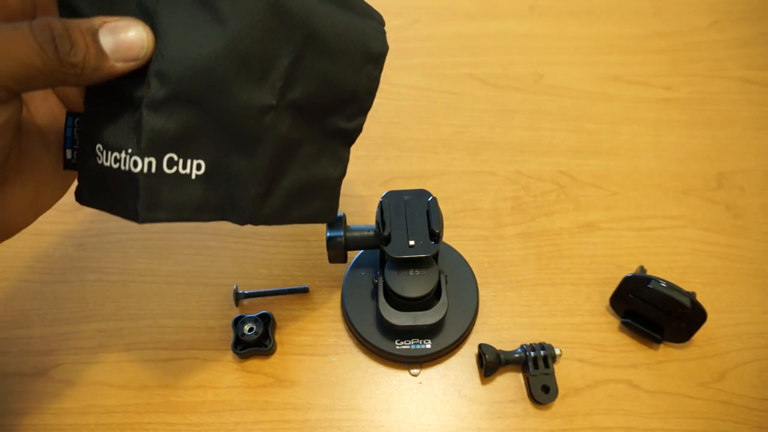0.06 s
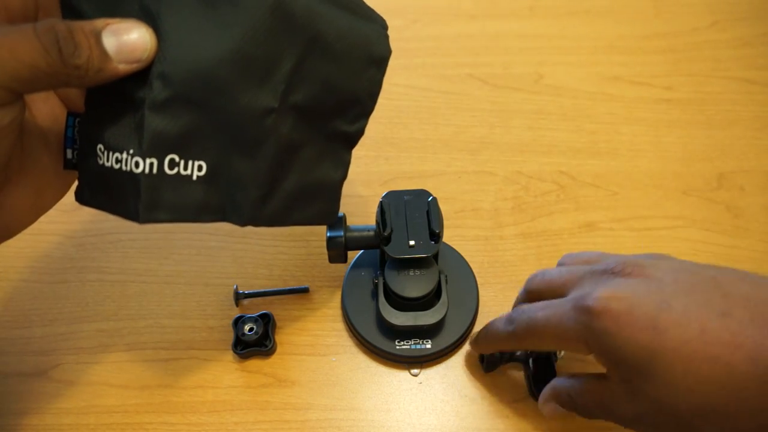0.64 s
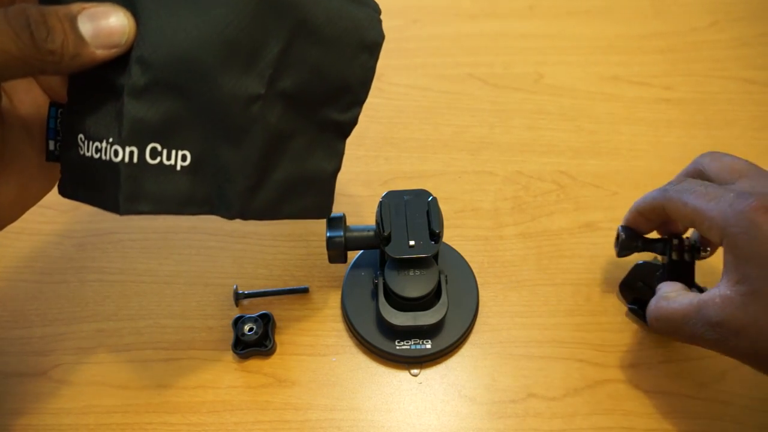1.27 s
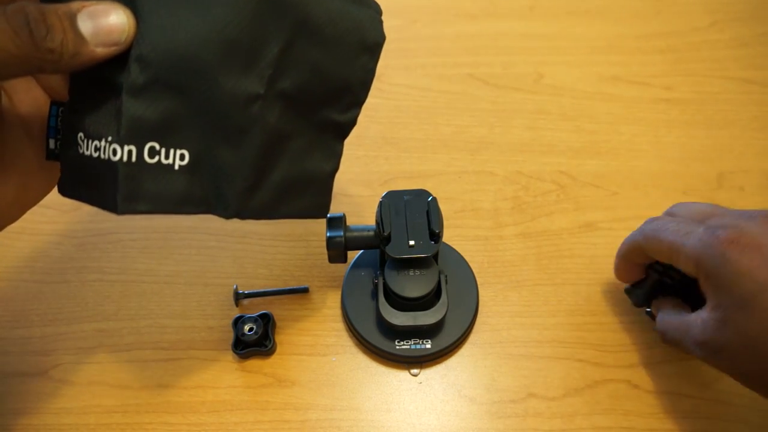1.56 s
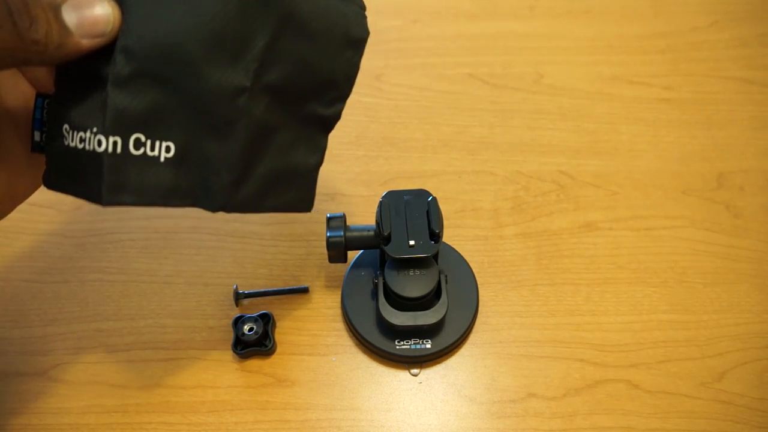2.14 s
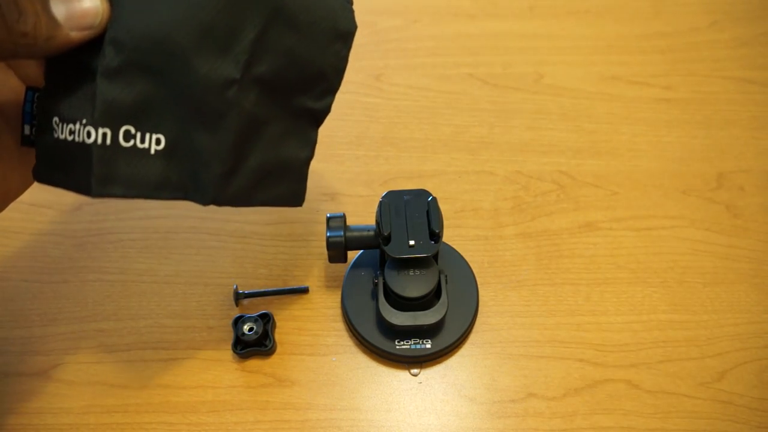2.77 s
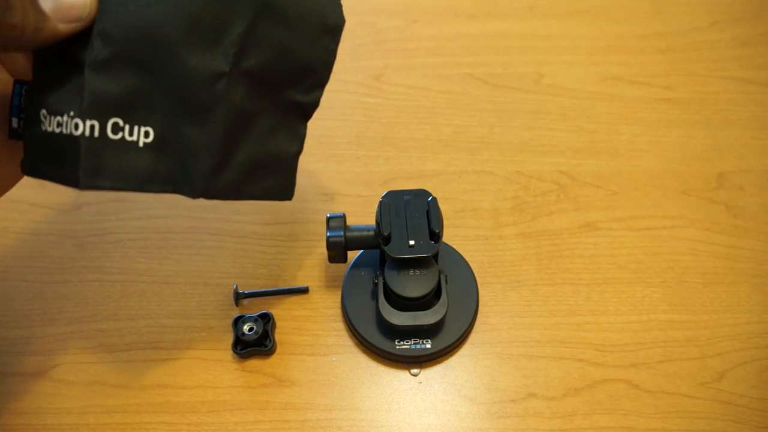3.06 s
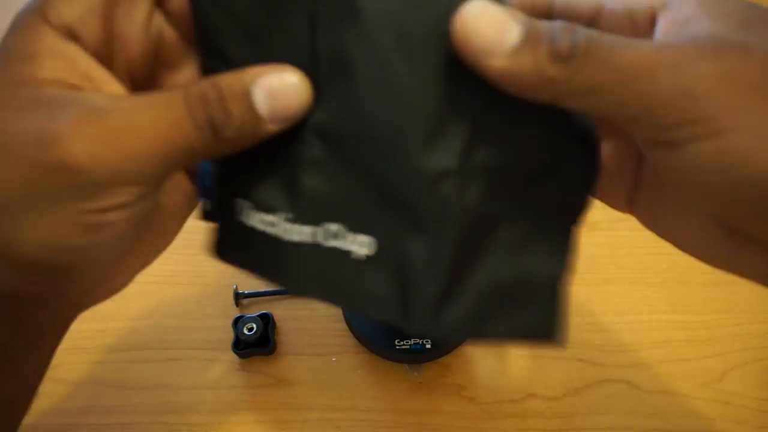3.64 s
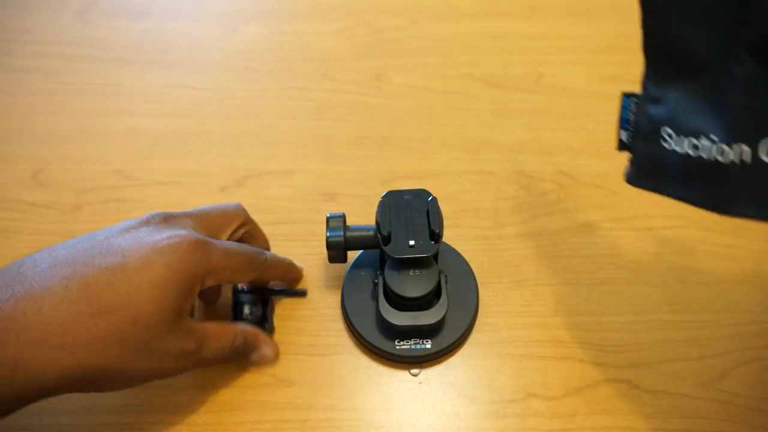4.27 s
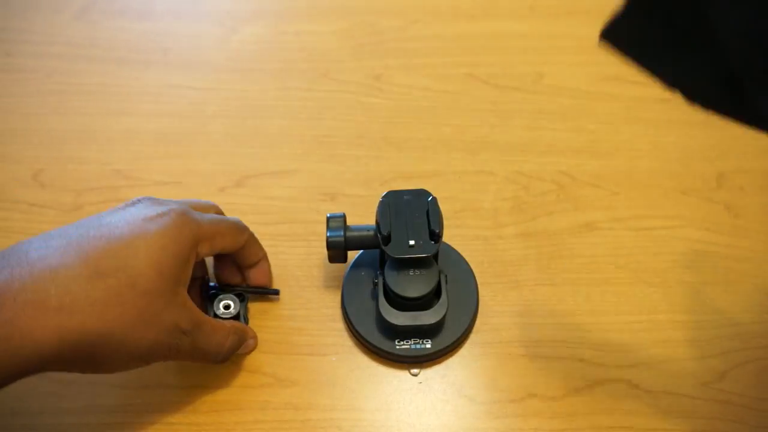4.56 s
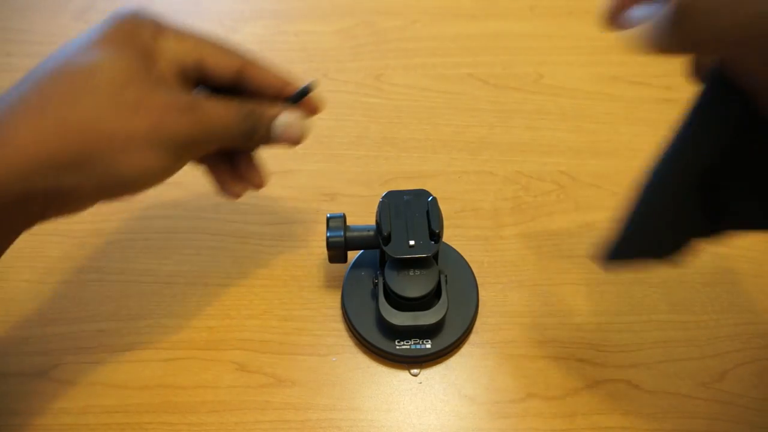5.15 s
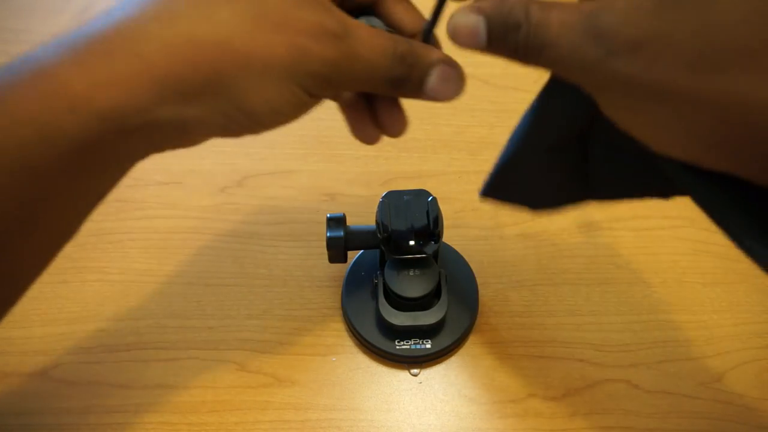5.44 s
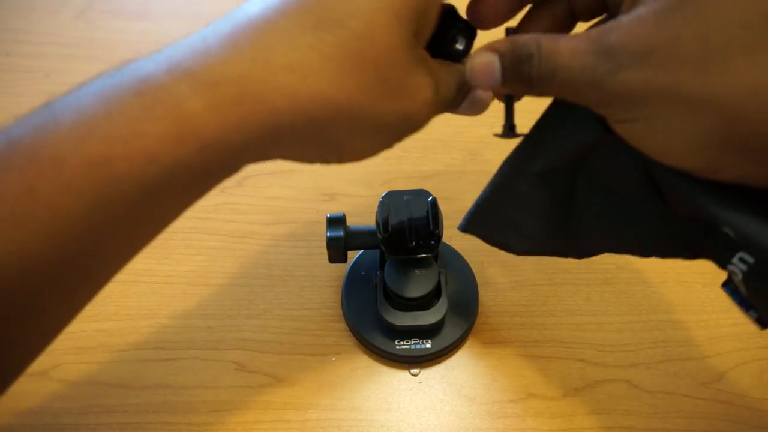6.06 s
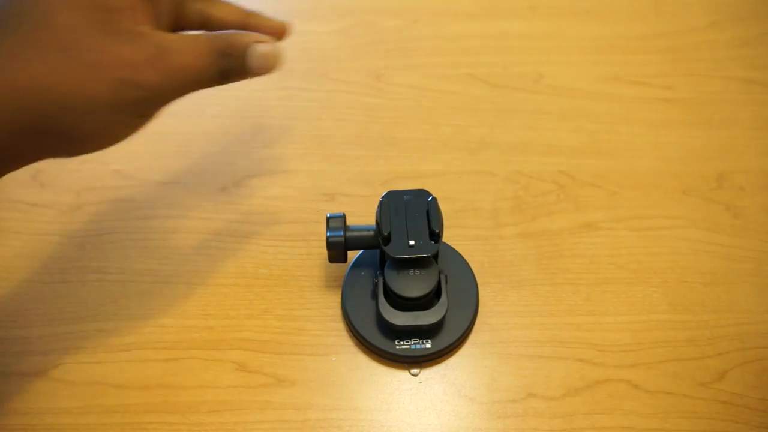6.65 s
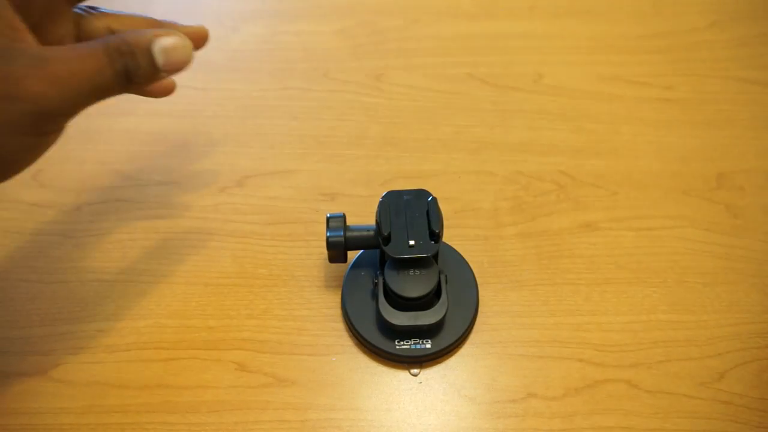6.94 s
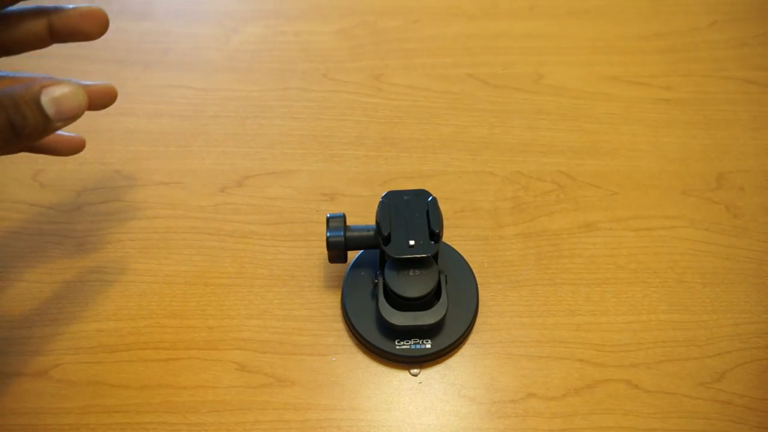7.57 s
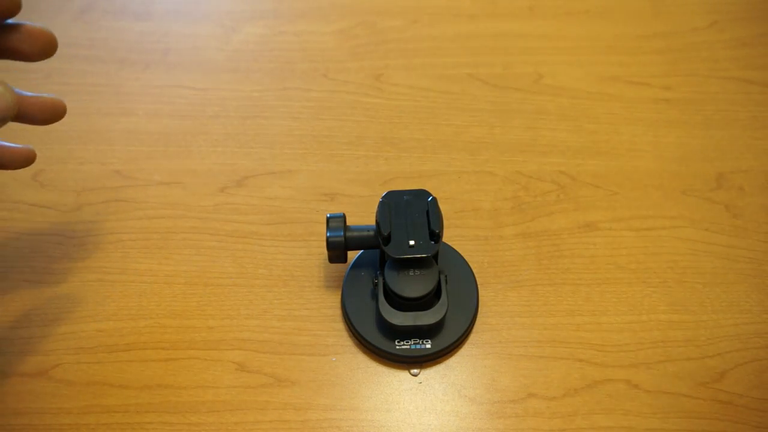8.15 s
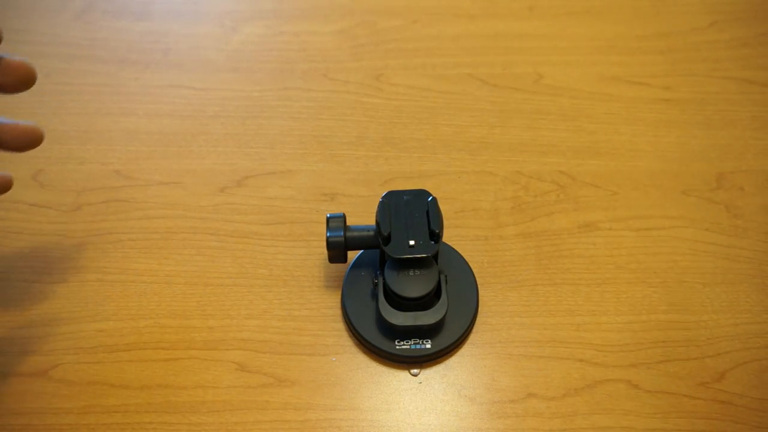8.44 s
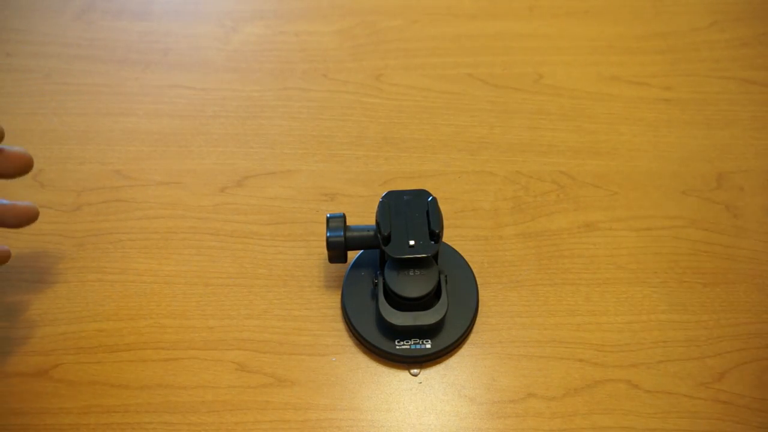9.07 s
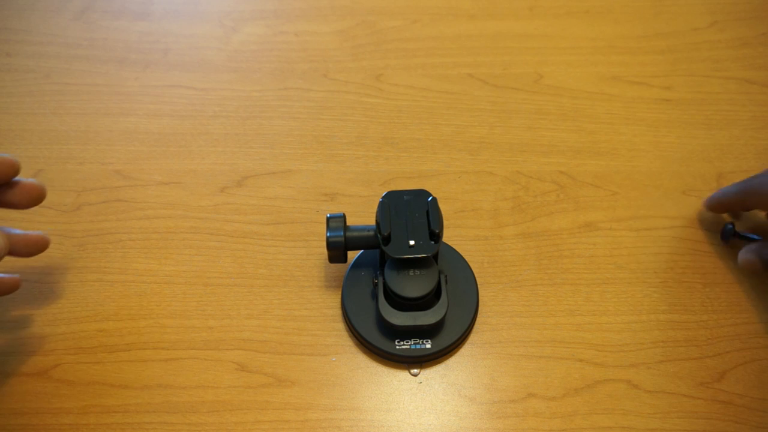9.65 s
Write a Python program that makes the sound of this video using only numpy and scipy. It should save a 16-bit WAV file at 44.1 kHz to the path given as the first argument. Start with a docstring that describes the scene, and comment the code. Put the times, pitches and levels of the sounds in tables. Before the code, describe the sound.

A low ventilation hum runs throughout in a bare, slightly echoing room, with the handling heard close up. Soft plastic knocks on a wooden table begin around 0.8 seconds, building to a quick clatter at 1.5 with a tiny squeak and pings from steel bolts. From 2.2 to 3 seconds comes the loudest tumble of parts, with clinks and short scrapes. A nylon pouch rustles and crinkles from about 3.6 to 5.3 seconds, while a small knock and a loose nut's high jingle sound between 4.4 and 4.9. Faint fabric brushing and light metal ticks continue until about 6.7. Separate plastic knocks fall between 7.2 and 8.2 seconds, followed by a rapid ratcheting run of clicks until 8.6. A part then slides across the wood, knocking sharply at 9.3 and scraping until about 9.8 seconds.

```python
"""Plastic parts on a wooden table

Small plastic camera-mount parts are gathered and put down to one side in a bare room. They knock,
tumble and scrape, driving the resonances of the tabletop. Steel bolts and a nut ping in their own modes,
a nylon pouch rustles from hand to hand by friction, and at the end a part is pushed across the wood.
Ventilation hums under it all."""
import sys
import numpy as np
from scipy import signal
from scipy.fft import rfft, irfft, next_fast_len
from scipy.io import wavfile
from scipy.ndimage import uniform_filter1d

SR = 44100
rng = np.random.default_rng(int(sys.argv[2]) if len(sys.argv) > 2 else 0)


def master(y):
    """Save y as 16-bit WAV."""
    cut = np.clip(np.atleast_2d(y).T, -1, 1)
    pcm = np.round(cut * 32767)  # scale
    wavfile.write(sys.argv[1], SR, pcm.astype(np.int16))


N = 432621


def impacts():
    """Impact and rebound: parts land on the wood, then rattle on their corners as they tumble."""
    # Each row: start in seconds, level in dB, hardness from 0 to 1.
    landings = [(.001, -34, 0.45), (0.78, -45, 0.2), (.905, -36, 0), (.916, -36.5, 0), (.935, -36.5, 0),
                (1.199, -35.5, 0.18), (1.225, -44, 0.3), (1.4157, -26, 0.18), (1.43, -27, 0.48),
                (1.445, -29, 0.4), (1.4766, -23, 0.57), (1.494, -33, 0.88), (1.511, -25, 0.66),
                (1.526, -25, 0.59), (2.176, -41.5, 0.67), (2.198, -38, 0.73), (2.336, -24.5, 0.73),
                (2.344, -22, .6), (2.361, -31, 0.73), (2.3794, -25, 0.65), (2.5239, -29.5, .5),
                (2.5624, -18, 0.43), (2.591, -25, 0.5), (2.6174, -20, .5), (2.643, -22.5, 0.64),
                (2.663, -21, 0.5), (2.691, -24, 0.64), (2.7203, -23.5, 0.62), (2.752, -24.5, 0.77),
                (2.778, -19.5, 0.53), (2.8, -26.5, 0.6), (2.82, -26, .3), (2.982, -48, .65),
                (4.3599, -35, 0.6), (4.3834, -33, .8), (4.3923, -30.5, 0.79), (4.399, -34, 0.82),
                (4.763, -45, 0.89), (4.846, -42.5, 0.87), (7.17, -36, 0), (7.176, -31, 0.05),
                (7.199, -29, 0.48), (7.23, -34, 0), (7.3533, -25, 0.65), (7.376, -34.5, 0.62),
                (7.523, -39, 0.2), (7.656, -51, 0), (7.846, -37, 0.03), (8.2466, -25, 0.68),
                (9.3184, -32, 0.38), (9.333, -29.5, 0.64), (9.3465, -24.5, 0.48), (9.434, -38.5, 0.77),
                (9.556, -43, 0.82), (9.719, -37, 0.72)]
    # Each row: start in seconds, length in seconds, mean level of a contact in dB.
    tumbles = [(1.449, .09, -33.5), (2.342, .04, -33.5), (2.479, .06, -41.5), (2.63, .1, -32),
               (2.796, 0.031, -34.5), (2.917, .1, -45), (4.401, .045, -39.5), (9.347, .05, -41.5)]
    out = np.zeros(N)
    for start, db, hardness in landings:
        add(out, start, amp(db) * blow(hardness))
    for start, length, db in tumbles:
        corners = [blow(hardness=0.59) for _ in range(6)]
        for k, (at, chance_db) in enumerate(touches(start, length, per_s=80, spread_db=3)):
            add(out, at, amp(db + chance_db) * corners[k % len(corners)])
    return out


def blow(hardness, knock_width=1.843):
    """Contact time sets bandwidth: a hard blow is brief and bright, a soft one longer and lower."""
    # The softest and hardest blow. Each: knock pitch in Hz, then thud, clack and tick gains in dB.
    softest = (887, -1.5, -31.5, -38)
    hardest = (1490, -8, 9, -9.5)
    # Thud, clack and tick before softening. Each row: low and high edge in Hz, level in dB, T60 in seconds.
    bands = [(127, 660, -4, 0.094), (2575, 4290, 1, 0.023), (5000, 14600, -4.5, 0.0067)]
    knock_hz, thud_db, clack_db, tick_db = softest + hardness * np.subtract(hardest, softest)
    softness = np.clip(-clack_db / 25, 0, 1)
    stretch, dulling = 1 + softness, 1 - 0.2 * softness
    snap = 3.7 * (1 - softness)
    sound = burst(knock_hz / knock_width, knock_hz * knock_width, 0.039 * stretch, snap)
    for (lo, hi, band_db, t60), gain_db in zip(bands, (thud_db, clack_db, tick_db)):
        sound += amp(band_db + gain_db) * burst(lo, hi * dulling, t60 * stretch, snap)
    return sound


def tabletop(force):
    """Forced vibration: the board passes the force on and rings at its resonances."""
    # Each row: frequency in Hz, bandwidth in Hz, gain over the broad response in dB.
    resonances = [(135.3, 10.6, 10), (424, 240, 2.5), (290, 28, 9.5), (524, 23, 3.5), (770, 20, 3),
                  (911, 22, 4.5), (1180, 48, 4), (1338, 11, 6.5), (1440, 47, 3.5), (1670, 25, 2.5),
                  (1764, 12, 4.5), (1914, 100, 1), (2820, 30, 4.5), (2440, 670, 2.5), (3250, 44, 4.5),
                  (3990, 200, -4), (4360, 90, -1), (5800, 450, 4), (7000, 490, 2)]
    out = force.copy()
    for hz, width, db in resonances:
        out += (amp(db) - 1) * signal.lfilter(*signal.iirpeak(hz, hz / width, fs=SR), force)
    return out


def bolts():
    """Free vibration: struck steel bolts ring in high, inharmonic modes."""
    # Each row: frequency in Hz, level in dB, T60 in seconds.
    modes = [(4555, -2, 0.063), (4512, -18, 0.41), (4800, -43, 0.04), (6500, -31, 0.042),
             (6720, -14, 0.094), (7000, -10, 0.14), (7800, -20, 0.13), (9860, -16, 0.045),
             (10130, 1, 0.017), (10840, -3, 0.035), (12300, -7, .025), (13000, -10, .05)]
    # Each row: start in seconds, level in dB, favoured frequency in Hz.
    strikes = [(1.199, -28, 10600), (1.417, -36, 8260), (1.477, -22.5, 7000), (1.496, -27, 4460),
               (1.511, -24, 4600), (2.337, -18, 5000), (2.524, -35, 4500), (2.586, -22, 4530),
               (2.643, -17.5, 4440), (2.721, -29, 7240), (2.753, -29, 6760), (3.018, -35.5, 4400)]
    return pings(strikes, modes, reach_octaves=0.28, rattle=0.55)


def jiggling_nut(jiggle_db=-9):
    """Repeated impact: a nut loose in its knob rings when struck and again at each lighter touch."""
    # Each row: frequency in Hz, level in dB, T60 in seconds.
    modes = [(5880, -5.5, 0.02), (8140, 3, 0.02), (8240, -1.5, 0.036), (8450, 2, 0.027), (10370, 0, 0.028)]
    # Each row: start in seconds, level in dB, favoured frequency in Hz, length of the jiggle in seconds.
    jolts = [(4.36, -27, 8400, .06), (4.709, -36.5, 8340, .04), (4.761, -23, 9340, .06),
             (4.846, -24, 5500, .005), (4.889, -17, 5500, .005), (5.431, -48, 8250, .12),
             (6.057, -40.5, 8300, .05), (6.107, -35.5, 8900, .005), (6.169, -41, 9000, .02),
             (6.375, -49, 8300, .02), (7.845, -47, 8300, .03), (8.249, -36, 7860, .035)]
    strikes = []
    for start, db, hz, length in jolts:
        strikes.append((start, db, hz))
        for at, chance_db in touches(start, length, per_s=110, spread_db=2.5):
            strikes.append((at, db + jiggle_db + chance_db, hz))
    return pings(strikes, modes, reach_octaves=0.15, rattle=1.0)


def pings(strikes, modes, reach_octaves, rattle):
    """Modal superposition: a strike favours modes near one pitch; a loose fit jitters their phase."""
    t, out = np.arange(6000) / SR, np.zeros(N)
    hz, db, t60 = np.transpose(modes)[:, :, None]
    for start, strike_db, favoured_hz in strikes:
        weight = amp(strike_db + db) / (1 + (np.log2(hz / favoured_hz) / reach_octaves) ** 2)
        shake = unit(uniform_filter1d(rng.standard_normal((len(modes), len(t))), size=120))
        ring = np.sin(2 * np.pi * hz * t + rattle * shake) * np.exp(-np.log(1000) * t / t60)
        add(out, start, (weight * ring).sum(0))
    return out


def ratchet():
    """Catch and release: each rib of a ribbed part snaps free and excites the same bands."""
    # Each row: start in seconds, level in dB.
    ribs = [(8.2969, -26), (8.336, -27), (8.3467, -31), (8.359, -30), (8.3855, -26), (8.4199, -27),
            (8.444, -28), (8.4713, -27.5), (8.491, -29), (8.506, -29), (8.5222, -31), (8.535, -41),
            (8.552, -39)]
    # Each row: low and high edge in Hz, level in dB, T60 in seconds.
    bands = [(240, 790, -13, 0.054), (764, 2520, 0.5, 0.033), (3070, 4350, 3, 0.01), (4600, 6360, -8, .015),
             (7000, 10500, -13.5, 0.01)]
    out = np.zeros(N)
    for start, db in ribs:
        for lo, hi, band_db, t60 in bands:
            add(out, start, amp(db + band_db) * burst(lo, hi, t60, snap=4.0))
    return out


def clicks():
    """Brief contact gives high frequencies: plastic edges click past one another."""
    # Each row: start in seconds, level in dB.
    slips = [(1.199, -42), (1.477, -49), (2.482, -51), (2.561, -44), (2.633, -42), (2.697, -36),
             (2.7525, -60), (2.982, -51), (4.3602, -43), (4.384, -45), (4.762, -42), (8.296, -30.5),
             (9.3189, -32.5), (9.351, -33.5), (9.357, -37), (9.434, -46)]
    out = np.zeros(N)
    for start, db in slips:
        add(out, start, amp(db) * burst(4000, 13800, t60=0.0082, snap=1.2))
    return out


def thumps():
    """A slow force excites low frequencies: a hand or a whole part presses on the board."""
    # Each row: start in seconds, level in dB.
    presses = [(1.418, -33), (1.478, -31), (4.385, -42), (7.198, -44), (8.297, -41), (9.346, -37),
               (9.745, -39)]
    out = np.zeros(N)
    for start, db in presses:
        add(out, start, amp(db) * burst(106, 167, t60=0.07, snap=0))
    return out


def slides(gain_db=-5.5):
    """Stick-slip friction: plastic scrapes over the grain of the wood."""
    # Each row: start in seconds, length in seconds, level in dB.
    pushes = [(.74, .05, -51), (.92, 0.036, -47), (1.28, 0.16, -51.5), (2.18, 0.021, -35), (2.22, .08, -50),
              (2.43, 0.19, -38.5), (2.97, 0.07, -34.5), (8.68, 0.474, -49), (9.13, 0.19, -39),
              (9.41, 0.066, -34), (9.47, 0.33, -37.5)]
    # Each row: frequency in Hz, relative spectral density in dB.
    spectrum = [(100, -20), (300, -1.5), (500, -1.5), (750, 4.5), (1300, -1), (2200, -5), (3600, -12),
                (5000, -24), (9000, -45), (15000, -32)]
    pressure = strokes(pushes, rise_s=0.0067, fall_s=0.012)
    grain = friction(catches_per_s=1400, spread_db=0.5, hiss=0.93, flutter_db=2.0)
    return amp(gain_db) * pressure * colour(grain, spectrum)


def squeaks(waver=0.012):
    """Friction-driven oscillation: a hollow part judders on the wood and sings unevenly."""
    # Each row: start in seconds, length in seconds, pitch in Hz, level in dB.
    tones = [(0.744, 0.061, 1110, -43), (1.194, 0.036, 770, -40), (1.27, 0.21, 800, -54),
             (1.38, 0.099, 934, -30.5), (7.166, 0.023, 939, -32.5), (7.499, 0.024, 920, -37),
             (7.843, 0.022, 893, -35)]
    out = np.zeros(N)
    for start, length, hz, db in tones:
        judder = unit(uniform_filter1d(rng.standard_normal(4 * SR // 10), size=200))
        pitch = hz * (1 + waver * judder[:round(length * SR)])
        tone = np.sin(2 * np.pi * np.cumsum(pitch) / SR)
        add(out, start, amp(db) * tone * signal.windows.tukey(len(tone), .6))
    return out


def pouch(rub_db=1.5, brush_db=2, snap_width=1.54):
    """Friction and buckling: nylon threads catch on one another, and now and then a crease snaps."""
    # Each row: start in seconds, length in seconds, level in dB, left over right in dB.
    rubs = [(3.582, 0.043, -49, 2), (3.691, .33, -42, 0.5), (4.41, 0.31, -47.5, -1), (4.758, 0.056, -45, 0),
            (4.873, 0.03, -39, -1), (4.982, 0.039, -37, -3.5), (5.136, 0.03, -35, -3)]
    # Each row: start in seconds, length in seconds, level in dB.
    brushes = [(4.08, .3, -60.5), (5.25, 1.46, -57.5), (5.49, 0.05, -51.5), (5.99, 0.04, -51),
               (6.17, 0.013, -63), (6.37, .02, -53.5), (7.1, 0.14, -68), (7.56, 0.38, -65),
               (8.07, 0.51, -53), (8.67, 0.053, -55), (8.84, 0.058, -55.5), (9.1, .06, -55),
               (9.2, .23, -61)]
    # Each row: start in seconds, level in dB, centre frequency in Hz.
    creases = [(3.729, -39.5, 450), (3.757, -38, 880), (3.79, -32.5, 460), (3.7919, -28, 2180),
               (3.921, -31, 7900), (5.179, -35, 2680), (5.2467, -34.5, 1880), (5.995, -50, 3100)]
    # Each row of both: frequency in Hz, relative spectral density in dB.
    rub_spectrum = [(200, 2.5), (700, -5), (1300, -4.5), (2000, 2.5), (3200, 2.5), (5000, 0), (7000, -2.5),
                    (11000, -3), (15500, -6.5)]
    brush_spectrum = [(300, -3), (1500, 4.5), (3500, 3), (7000, -4), (11000, 0.5), (15500, -1)]
    threads = friction(catches_per_s=2400, spread_db=3.0, hiss=1.5, flutter_db=1.73)
    rubbing = []
    for side in (1, -1):  # left, right
        panned = [(start, length, db + side * lean_db / 2) for start, length, db, lean_db in rubs]
        rubbing.append(strokes(panned, rise_s=0.026, fall_s=0.052))
    brushing = strokes(brushes, rise_s=0.034, fall_s=0.033)
    middle = amp(brush_db) * brushing * colour(threads, brush_spectrum)
    for start, db, hz in creases:
        add(middle, start, amp(db) * burst(hz / snap_width, hz * snap_width, t60=0.0095, snap=5.4))
    return amp(rub_db) * np.array(rubbing) * colour(threads, rub_spectrum) + middle


def room(x, crossfade_hz=6.3, count=3):
    """Reverberation: three echo patterns cross-fade steadily, so the room sounds even, not hollow."""
    angle = 2 * np.pi * crossfade_hz * np.arange(N) / SR
    shares = [np.cos(angle + np.pi * k / count) * np.sqrt(2 / count) for k in range(count)]
    return sum(signal.oaconvolve((x * share)[None], echo_pattern(), axes=1)[:, :N] for share in shares)


def echo_pattern():
    """Impulse response: strong early reflections, then exponential decay at each band's own rate."""
    # Each row: frequency in Hz, T60 in seconds.
    decay_times = [(150, 1), (400, 0.37), (1000, 0.52), (2800, 0.55), (7000, 0.4), (14000, 0.42)]
    # Each row: frequency in Hz, level of the tail in dB.
    tail_levels = [(150, -9), (400, -0.5), (1400, 2), (3500, -4), (7000, -4.5), (14000, -6)]
    # Reflections from the table and near walls. Each row: delay in seconds, gain on the tail in dB.
    early_gains = [(.003, 10.5), (.007, 3), (.016, 4), (.03, 5), (.045, 4.5), (.075, 2)]
    hz, t, noise = signal.stft(stereo_width(rng.standard_normal((2, SR))), SR, nperseg=256)
    decay = np.exp(-np.log(1000) * t / read(decay_times, hz)[:, None])
    energy = SR * np.mean(decay ** 2, axis=1, keepdims=True)
    decay *= amp(read(tail_levels, hz))[:, None] / np.sqrt(energy)
    tail = signal.istft(noise * decay, SR, nperseg=256)[1][:, :SR]
    return tail * amp(np.interp(np.arange(SR) / SR, *np.transpose(early_gains)))


def ventilation(rush_db=-44.42, phase_step_rad=0.77):
    """Broadband and tonal fan noise: a low rush under tones that wander in phase."""
    # Each row: frequency in Hz, relative spectral density in dB.
    spectrum = [(12, -63), (20, -22), (60, -3.5), (93, -14), (127, -9), (172, -8), (222, -4.5),
                (328, -10.5), (377, -15), (527, -17.5), (873, -17.5), (1060, -19), (2020, -32),
                (14300, -47.5), (16000, -43)]
    # Each row: frequency in Hz, rms level in dB.
    fan_tones = [(59.2, -64), (145.3, -56.5), (226.1, -52.5)]
    out = amp(rush_db) * colour(stereo_width(rng.standard_normal((2, N))), spectrum)
    t, knots = np.arange(N) / SR, np.linspace(0, N / SR, num=200)
    for hz, db in fan_tones:
        drift = np.interp(t, knots, np.cumsum(phase_step_rad * rng.standard_normal(len(knots))))
        out += amp(db) * np.sqrt(2) * np.sin(2 * np.pi * hz * t + drift)
    return out


def stereo_width(pair):
    """Stereo width: noise is wide in the middle frequencies and centred in the bass and high treble."""
    # Each row: frequency in Hz, left-right correlation from 0 to 1.
    correlation = [(25, 1), (60, 1), (290, 0.97), (550, 0.75), (1000, 0.82), (1500, 0.69), (3100, 0.45),
                   (7000, 0.99), (15000, 1)]
    size = next_fast_len(pair.shape[1])
    alike = read(correlation, np.fft.rfftfreq(size, 1 / SR))
    mid, side = rfft(pair, size) * np.sqrt([(1 + alike) / 2, (1 - alike) / 2])
    return irfft(np.array([mid + side, mid - side]), size)[:, :pair.shape[1]]


def burst(lo_hz, hi_hz, t60, snap, contact_s=0.0059, rise_s=0.00043):
    """Contact transient: band-passed impulse and chatter, with the energy of rms 1 over contact_s."""
    t = np.arange(4096) / SR
    chatter = rng.standard_normal(len(t)) * np.exp(-np.log(1000) * t / t60) * (1 - np.exp(-t / rise_s))
    force = chatter + snap * (t == 0)
    hz = np.fft.rfftfreq(len(t), 1 / SR) + 1
    detuning = 1j * (hz - lo_hz * hi_hz / hz) / (hi_hz - lo_hz)
    band_pass = 1 / ((1 + detuning) * (1 + detuning + detuning ** 2))  # third order
    sound = irfft(rfft(force) * band_pass)[:len(t) // 2]
    return sound * np.sqrt(contact_s * SR / np.sum(sound ** 2))


def friction(catches_per_s, spread_db, hiss, flutter_db):
    """Shot noise: many tiny catches of uneven size over a smooth hiss, swelling in clumps."""
    catches = rng.standard_normal(N) * (rng.random(N) < catches_per_s / SR)
    catches *= amp(spread_db * np.minimum(rng.exponential(1, N), 4))
    clumps = unit(uniform_filter1d(uniform_filter1d(rng.standard_normal(N), size=500), size=400))
    return (unit(catches) + hiss * rng.standard_normal(N)) * amp(flutter_db * clumps)


def strokes(rows, rise_s, fall_s):
    """Envelopes summed in power: each stroke swells up to its start, holds and dies away."""
    t, power = np.arange(0, N, 32) / SR, 0
    for start, length, db in rows:
        outside = np.maximum(start - t, 0) / rise_s + np.maximum(t - start - length, 0) / fall_s
        power = power + (amp(db) * np.exp(-outside)) ** 2
    return np.interp(np.arange(N) / SR, t, np.sqrt(power))


def touches(start, length, per_s, spread_db, count=32):
    """Jittered contacts of a loose part. Each row: time in seconds, level about the mean in dB."""
    delays = (np.arange(count) + rng.random(count)) / per_s
    return np.column_stack([start + delays, spread_db * rng.standard_normal(count)])[delays < length]


def colour(x, spectrum):
    """Spectral shaping of a steady sound, at rms 1."""
    size = next_fast_len(N)
    gain = amp(read(spectrum, np.fft.rfftfreq(size, 1 / SR)))
    return unit(irfft(rfft(x, size) * gain, size)[..., :N])


def read(points, hz):
    """Interpolation on a log-frequency axis."""
    frequencies, values = np.transpose(points)
    return np.interp(np.log(hz + 1), np.log(frequencies + 1), values)


def add(mix, start_s, sound):
    """Superposition of a sound on the mix."""
    part = mix[max(round(start_s * SR), 0):][:len(sound)]
    part += sound[:len(part)]


def amp(db):
    """Decibels to amplitude ratio."""
    return 10 ** (np.asarray(db) / 20)


def unit(x):
    """Normalisation to rms 1."""
    return x / np.sqrt(np.mean(x ** 2) + 1e-20)


def scene(steel_echo_db=-1, cloth_echo_db=-5, lean_db=0.5):
    """Level and time cues place the wood slightly right, the nut left, bolts and cloth near the middle."""
    wood = tabletop(impacts() + thumps() + ratchet() + clicks() + slides()) + squeaks()
    bolt_rings = bolts()
    nut = jiggling_nut()
    cloth = pouch()
    echoes = room(wood + amp(steel_echo_db) * (bolt_rings + nut) + amp(cloth_echo_db) * cloth.mean(0))
    to_left, to_right = amp([[lean_db], [-lean_db]]), amp([[-lean_db], [lean_db]])
    nut_pair = np.array([nut, np.roll(nut, 1)]) * to_left  # one sample later on the right
    return (wood + echoes) * to_right + bolt_rings + nut_pair + cloth + ventilation()


def record(dry, cutoff_hz=16200):
    """Band limiting: a steep low-pass filter removes the highest treble."""
    low_pass = signal.firwin(511, cutoff_hz, window=("kaiser", 9), fs=SR)
    return signal.oaconvolve(dry, low_pass[None], "same")


dry = scene()
out = record(dry)
master(out)
```